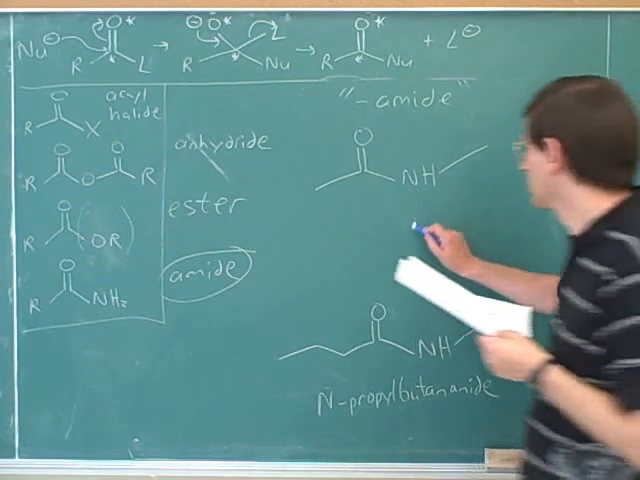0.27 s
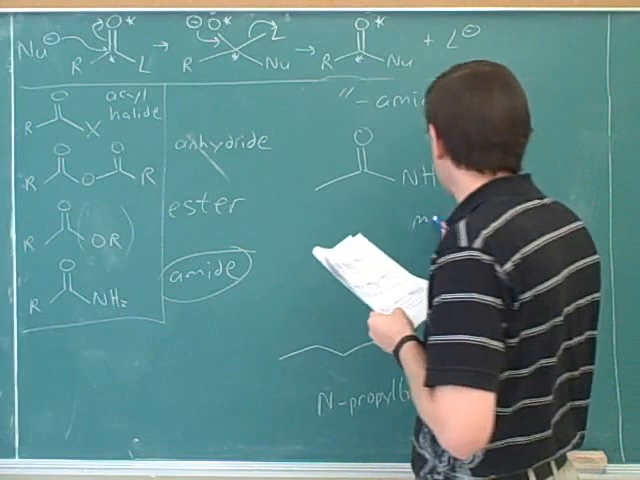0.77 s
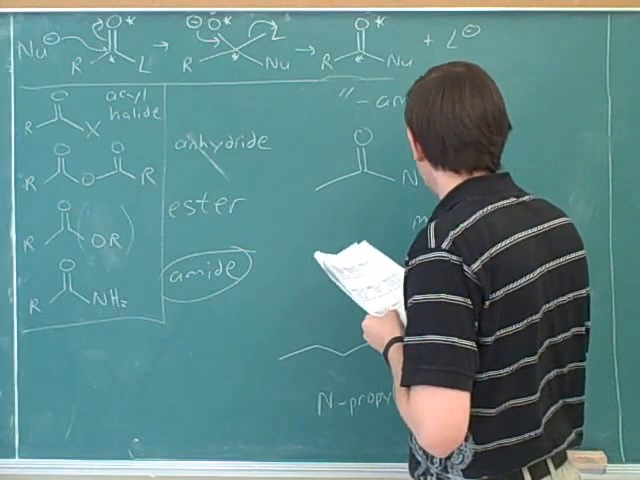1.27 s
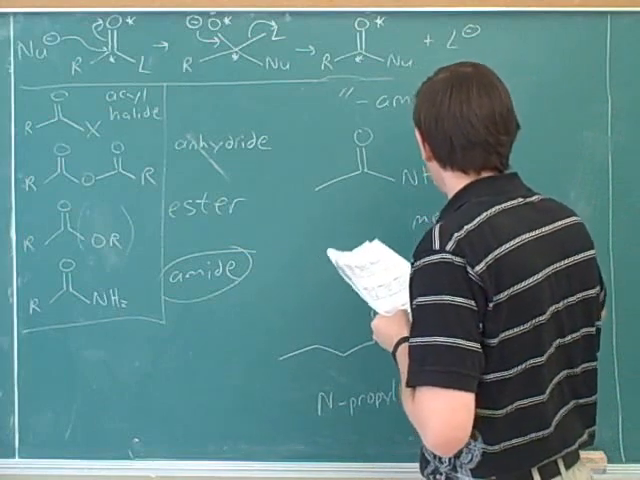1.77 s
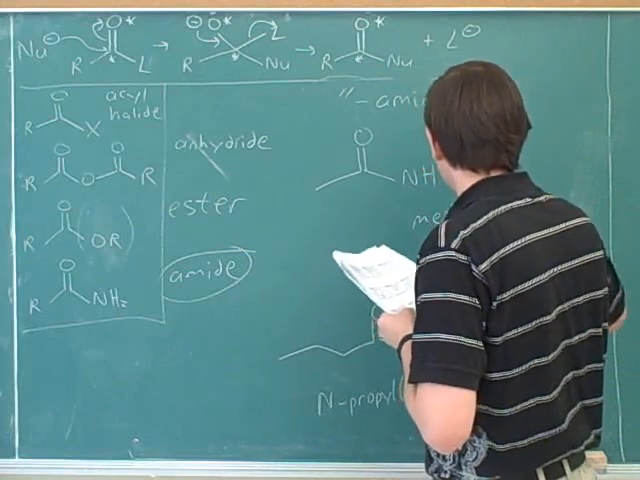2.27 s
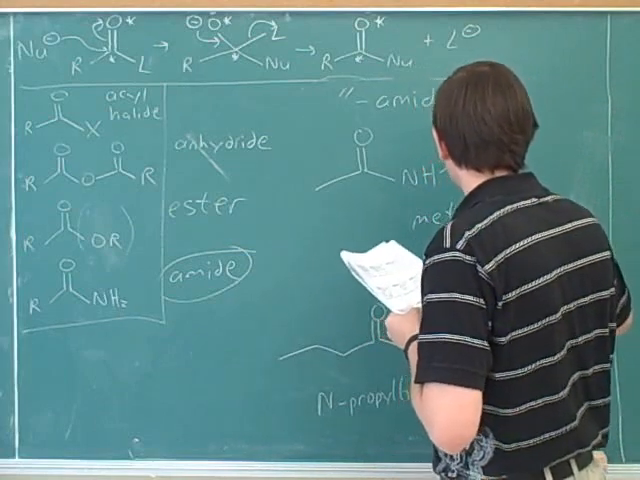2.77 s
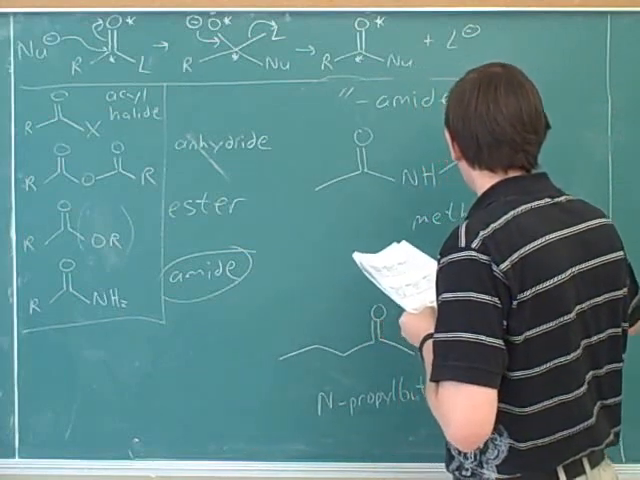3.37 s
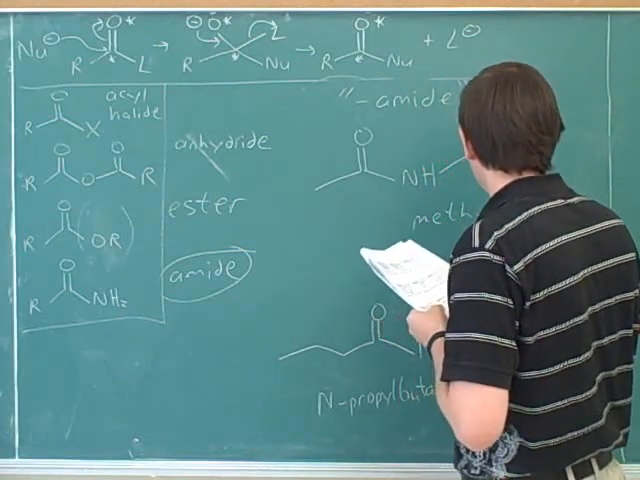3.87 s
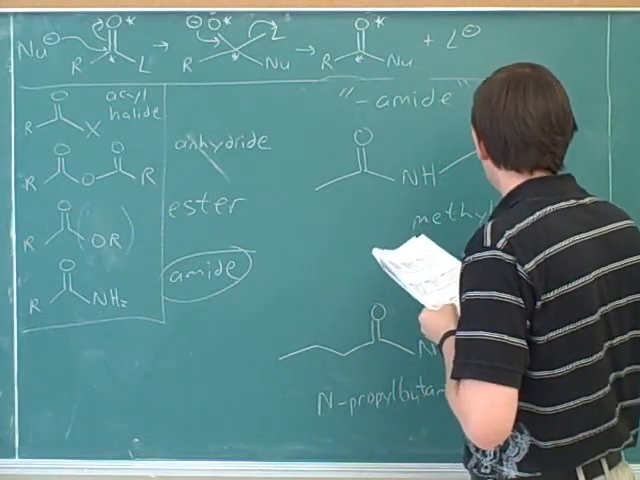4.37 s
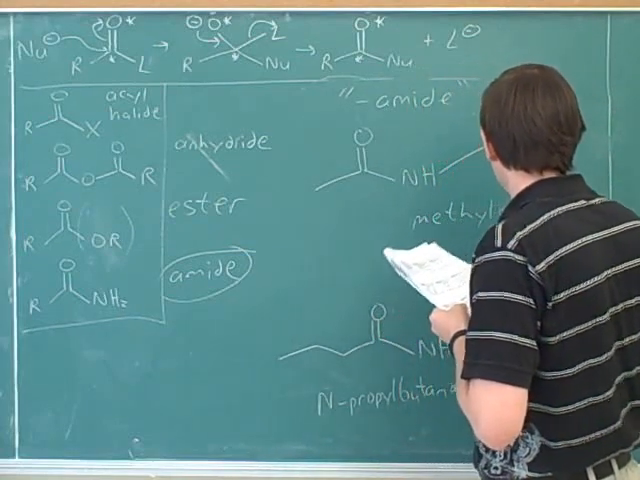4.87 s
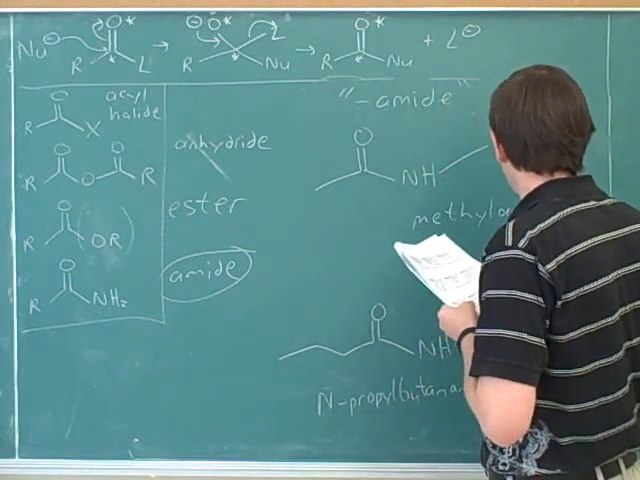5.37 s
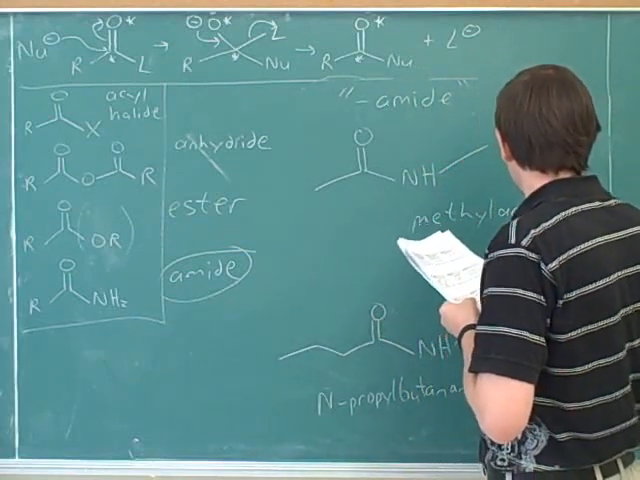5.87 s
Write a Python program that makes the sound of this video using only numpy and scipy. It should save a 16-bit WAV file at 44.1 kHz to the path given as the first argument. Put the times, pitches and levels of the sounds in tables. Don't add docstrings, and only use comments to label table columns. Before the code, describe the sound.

Someone writes on a blackboard: hard, woody chalk knocks with short room echo, faint dusty scrapes, and a quiet bed of rumble and hiss.

```python
import sys
import numpy as np
from scipy import signal
from scipy.fft import rfft, irfft
from scipy.io import wavfile
from scipy.ndimage import uniform_filter1d

SR = 44100
rng = np.random.default_rng(int(sys.argv[2]) if len(sys.argv) > 2 else 0)


def nominal_scale(level):
    x = np.asarray(level, float) / 20
    return 10 ** x


def store_wav(level_fs):
    pcm = np.round(np.clip(np.atleast_2d(level_fs), -1, 1) * 32767)
    wavfile.write(sys.argv[1], SR, pcm.T.astype(np.int16))


N = 269539

# start_s, knock_db (board), hardness_db, chalk_ring_db and thud_db over usual
TAPS = [(0.5, -37, 0.5, -7.5, -1), (1.0126, -36, -7, 2, -1), (1.4013, -32.5, -3.5, -9.5, 2.5),
        (1.6956, -31, 5.5, 5.5, -1.5), (1.8967, -32.5, 0, 3, 1.5), (2.2548, -31, -2, -2.5, 0),
        (2.4291, -33.5, -3, 0, 2), (2.6914, -30, 11, 4, -2), (3.1257, -32, -12, -2.5, -3.5),
        (3.77, -32.5, 3, 2, -1), (4.4305, -32.5, -5.5, 1, -3.5), (4.843, -30, 7, 1.5, -2.5),
        (5.0778, -29.5, -1.5, -6, -3.5), (5.2483, -32.5, 6.5, 3, 0), (5.9195, -34, 4.5, 5.5, 1.5),
        (6.0715, -33, 8, 6.5, 4)]


def gain_at(points, hz):
    f, db = np.transpose(points)
    return nominal_scale(np.interp(np.log(hz + 1), np.log(f), db))


def lift(modes, hz):
    return nominal_scale(sum(db / (1 + (2 * (hz - f) / width) ** 2) for f, width, db in modes))


def colour(x, gain):
    size = x.shape[-1]
    hz = np.arange(size // 2 + 1) * SR / size
    return irfft(rfft(x) * gain(hz), size)


def unit(x):
    return x / np.sqrt(np.mean(x ** 2))


def walk(rate_hz):
    hold = int(SR / rate_hz)
    levels = np.repeat(rng.standard_normal(N // hold + 1), hold)
    return uniform_filter1d(levels, hold)[:N]


def fade(t, t60):
    return nominal_scale(-60 * t / t60)


def taps():
    # pitch_hz, ring_db over the knock, belly_cm, node_spacing_cm,
    # lift_db of the noisy answer
    plate = [(564, -4, 7, 20.4, 8), (790, 4.5, 15, 79, 1.5), (982, 5, 19.6, 24.4, -3),
             (1414, -17, 23.6, 24, 2.5), (1058, 10, 9, 23, 1), (1650, -3, 10.6, 21, 3),
             (2154, -4, 17.7, 13.5, 0), (2330, -6, 20, 20, -1), (2610, 1.5, 11.9, 9.1, 1.5),
             (2866, -3, 7, 17, 1.5), (3240, -4.5, 10.7, 16, 0), (4130, -28, 7.7, 6.3, 0.5),
             (5000, -26, 4.1, 11.3, 3), (7500, -30, 24.6, 6.76, 3)]
    # start_s, then thud_db, knock_db, ring_db, grit_db, body_db, snap_db
    earlier = (-.22, -44, -35.5, -37, -56, -45, -50)
    hand_cm_per_s = 5
    likeness = 0.6
    spot_width = 0.08
    size = 32768
    out, noise = np.zeros(N + size), rng.standard_normal(size)
    gone = int(-earlier[0] * SR)
    out[:size - gone] += answer(noise, earlier[1:])[gone:]
    mode_hz, ring_db, belly_cm, spacing_cm, lift_db = np.transpose(plate)
    for s, db, hard, chalk, thud in TAPS:
        shape = np.cos(np.pi * (hand_cm_per_s * s - belly_cm) / spacing_cm) ** 2
        noise = likeness * noise + np.sqrt(1 - likeness ** 2) * rng.standard_normal(size)
        spot_modes = list(zip(mode_hz, spot_width * mode_hz, lift_db * (2 * shape - 1)))
        null = [(4840 + 54.3 * hard, 940, -7 + 0.17 * hard)]
        local = colour(noise, lambda hz: lift(spot_modes, hz) * lift(null, hz))
        width_ms = np.clip(0.12 - 0.006 * hard, 0.07, 0.16)
        i = int((s - width_ms / 1e3) * SR)
        levels_db = [db - 6.5 + thud,
                     db - 2.5,
                     db - 12.5 + chalk,
                     db - 18 + hard,
                     -42 + 0.67 * (db + 29.5),
                     db - 7.5 + 0.42 * hard + 0.52 * chalk]
        out[i:i + size] += answer(local, levels_db) * nominal_scale(-4.0)
        for hz, over_db, loudness in zip(mode_hz, ring_db, shape):
            t60 = 0.025 if hz < 1200 else 0.041
            out[i:i + 8192] += loudness * ring(hz, db + over_db, t60)
        out[i:i + 1024] += nominal_scale(db + 14.5 + 0.36 * hard) * push(width_ms)
    return out[:N]


def push(width_ms):
    # delay_ms, level_db
    echoes = [
        (1.35, -9),
        (5.2, -17),
        (8.3, -17),
        (18.3, 0.5),
        (21.5, -15),
    ]
    t_ms = np.arange(1024) / SR * 1e3

    def pulse(age, width):
        u = np.maximum(age, 0) / width
        rebound = 0.44 * (u / 2.8 * np.exp(1 - u / 2.14)) ** 3
        return (u * np.exp(1 - u)) ** 2 - rebound

    out = pulse(t_ms, width_ms)
    for (ms, db), (level_jitter, time_jitter) in zip(echoes, rng.standard_normal((len(echoes), 2))):
        image = pulse(t_ms - ms - 0.17 * time_jitter, 1.3 * width_ms)
        out = out + nominal_scale(db + 0.74 * level_jitter) * image
    return out


def ring(hz, db, t60):
    # delay_ms, level_db
    waves = [(4.6, 0), (13.5, -8), (17.5, -6), (23.5, -6), (30, -9)]
    out = 0
    for (ms, wave_db), turn in zip(waves, rng.random(len(waves))):
        age = np.maximum(np.arange(8192) / SR - ms / 1e3, 0)
        envelope = (1 - np.exp(-age / 0.00067)) * fade(age, t60)
        out = out + nominal_scale(db + wave_db) * envelope * np.sin(2 * np.pi * (hz * age + turn))
    return out


def answer(noise, levels_db):
    # low_hz, high_hz, delay_ms, build_up_ms, early_surplus_db, early_t60_s, room_t60_s
    layers = [
        (710, 975, 5.1, 8.9, -2, 0.22, 0.5),
        (1350, 3340, 0.81, 2.7, 7, 0.037, 0.44),
        (5550, 6500, 0.64, 0.38, 23.5, 0.037, 0.5),
        (10100, 13600, 0.21, 0.3, 2, 0.028, 0.35),
        (211, 531, 0.84, 27.8, 6, 0.019, 0.56),
        (3440, 4650, 1.1, 3.5, 2, 0.034, 0.45),
    ]
    t = np.arange(len(noise)) / SR
    first = int(0.036 * SR)
    out = 0
    for (lo, hi, lag_ms, rise_ms, early_db, early, late), db in zip(layers, levels_db):
        def band_gain(hz):
            return board_gain(hz) / np.sqrt((1 + (lo / (hz + 1)) ** 8) * (1 + (hz / hi) ** 8))

        band = colour(noise, band_gain)
        age = np.maximum(t - lag_ms / 1e3, 0)
        decay = nominal_scale(early_db) * fade(age, early) + fade(age, late)
        band = band * (1 - np.exp(-age * 1e3 / rise_ms)) * decay
        out = out + nominal_scale(db) * band / np.sqrt(np.mean(band[:first] ** 2))
    return out


def board_gain(hz):
    # pitch_hz, level_db per Hz
    board_colour = [(150, 8.5), (320, -1.5), (400, 2.5), (650, 1), (1150, 4.5), (1470, 5.5), (1900, 11.5),
                    (2900, 6.5), (3700, 2.5), (4900, 1), (6300, 5), (7400, 4), (9500, -2.5), (16500, -3)]
    # pitch_hz, width_hz, lift_db
    board_modes = [(390, 30, 5), (450, 30, 5), (530, 25, 2), (760, 60, 4), (1060, 70, 8), (2170, 90, 4),
                   (2570, 80, 4)]
    return gain_at(board_colour, hz) * lift(board_modes, hz)


def strokes():
    # start_s, hold_s, level_db, extra_treble_db
    slides = [(0.45, 0.017, -66, 1), (0.564, .03, -64, -2), (0.642, .02, -60.5, -1), (.7, .06, -69, 4),
              (.8, 0.034, -64.5, 0), (.87, 0.053, -66, 5), (1.13, 0.064, -66, -2), (1.23, 0.037, -64.5, 3),
              (1.466, 0.093, -64.5, -2), (2.31, .015, -64, 2), (2.356, 0.046, -63, 0),
              (3.334, 0.043, -62.5, -3), (3.45, .05, -68.5, 0), (4.55, 0.16, -64, -2),
              (5.484, 0.11, -65.5, -6), (5.63, .03, -69.5, 0), (5.7, .03, -66, -2), (5.79, 0.055, -73, 0),
              (.17, .03, -70, 3), (3.82, .02, -60, 5)]
    # pitch_hz, level_db per Hz
    grain_colour = [(2500, -8), (4500, -9), (6500, -4.5), (8500, -7.5), (11000, -11), (14000, -11),
                    (16500, -12)]
    attack_s, release_s = 0.047, 0.064
    t = np.arange(N) / SR
    grains = rng.standard_normal(N) * nominal_scale(2.2 * rng.exponential(size=N) + 2.3 * walk(75))
    grains = unit(colour(grains, lambda hz: gain_at(grain_colour, hz)))
    treble = colour(grains, lambda hz: 1 / (1 + (9500 / (hz + 1)) ** 8))
    hiss = 0
    for s, hold, db, treble_db in slides:
        edge_db = -20 * np.maximum((s - t) / attack_s, (t - s - hold) / release_s).clip(0)
        hiss = hiss + nominal_scale(db + edge_db) * (grains - treble + treble * nominal_scale(treble_db))
    tail = rng.standard_normal(8192) * fade(np.arange(8192) / SR, 0.22)
    return hiss + nominal_scale(-6.5) * signal.fftconvolve(hiss, tail / np.linalg.norm(tail))[:N]


def ticks():
    # start_s, peak_db
    flakes = [
        (2.3535, -42),
        (2.3634, -33),
    ]
    out = np.zeros(N)
    for s, db in flakes:
        out[int(s * SR)] = nominal_scale(db + 5)
    return signal.sosfilt(signal.butter(2, 5000, "hp", fs=SR, output="sos"), out)


def air():
    # pitch_hz, level_db per Hz
    air_colour = [(12, -29), (22, 0.5), (45, -4), (200, -9.5), (260, -13), (350, -18), (480, -18.5),
                  (620, -24.5), (1200, -30), (2580, -38.5), (4400, -41), (6000, -43), (13600, -45),
                  (16500, -47)]
    # pitch_hz, width_hz, lift_db
    duct_modes = [(27, 32, 2), (58.3, 9.7, 0.5), (116.4, 34, 7), (187.3, 18, 5)]
    # time_s, level_db
    flow = [(0.0, -50.5), (1.9, -51), (2.09, -52), (2.52, -50), (4.25, -52), (5.09, -50.5), (5.82, -50.5),
            (6.11, -49)]
    shake_db, shake_rise_s, shake_t60_s = -2.5, 0.017, 0.96
    t = np.arange(N) / SR
    boom = 0
    for s, knock_db, *_ in TAPS:
        age = np.maximum(t - s, 0)
        envelope = (1 - np.exp(-age / shake_rise_s)) * fade(age, shake_t60_s)
        boom = boom + nominal_scale(shake_db + knock_db + 32.5) * envelope
    bed = colour(rng.standard_normal(N), lambda hz: gain_at(air_colour, hz) * lift(duct_modes, hz))
    bed = nominal_scale(-47.5) * unit(bed)
    low = colour(bed, lambda hz: 1 / (1 + (hz / 220) ** 4))
    flow_s, flow_db = np.transpose(flow)
    swell_db = np.interp(t, flow_s, flow_db - np.mean(flow_db))
    flutter_db = 0.5 * walk(10.0)
    return bed - low + low * (1 + boom) * nominal_scale(swell_db - 2.0 + flutter_db)


def scene():
    mix = taps() + ticks() + strokes() + air()
    return mix[None]


def roll_off(x):
    return signal.sosfilt(signal.butter(12, 15800, fs=SR, output="sos"), x)


def record(dry):
    return roll_off(dry)


dry = scene()
out = record(dry)
store_wav(out)
```